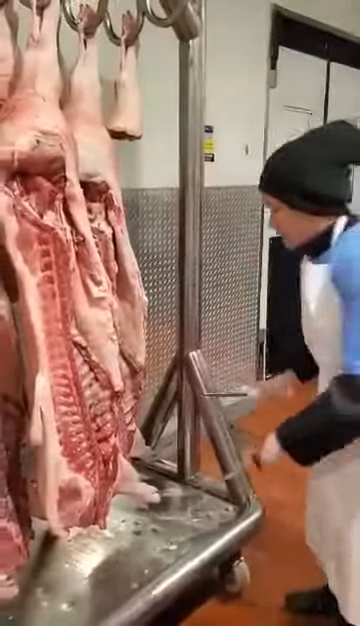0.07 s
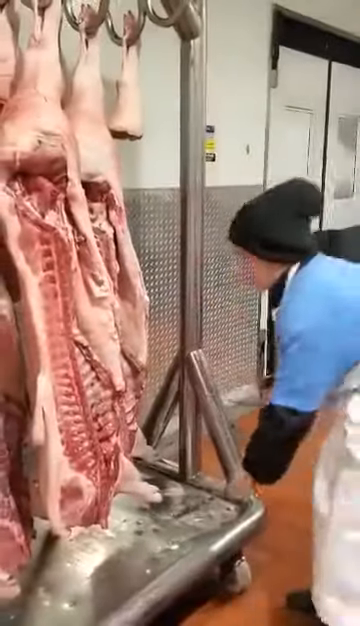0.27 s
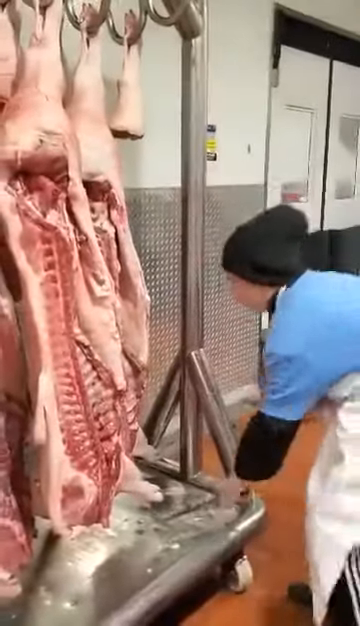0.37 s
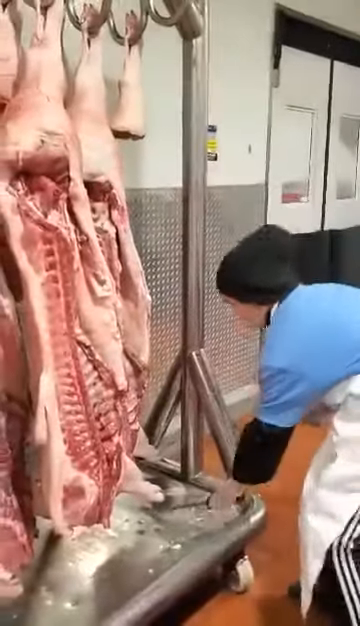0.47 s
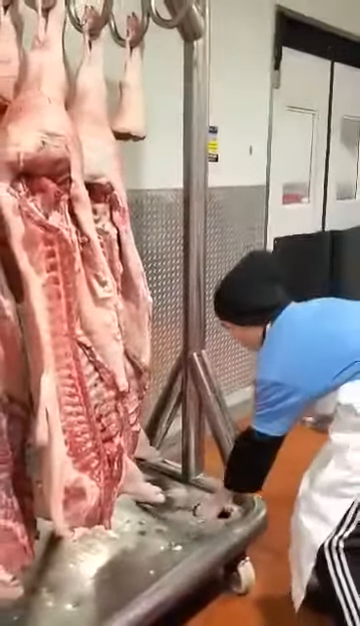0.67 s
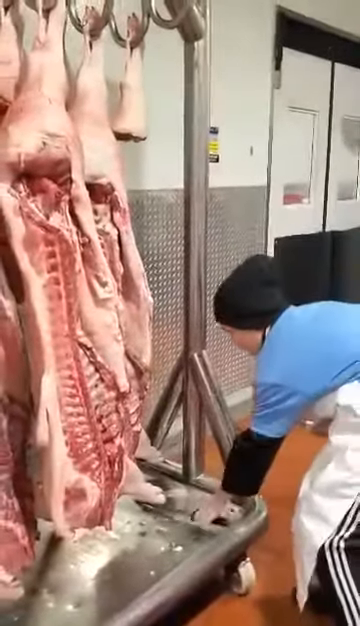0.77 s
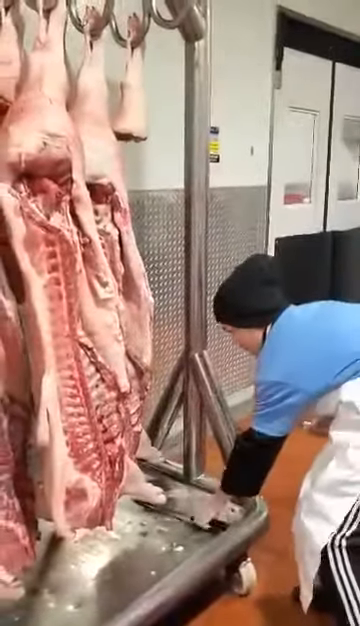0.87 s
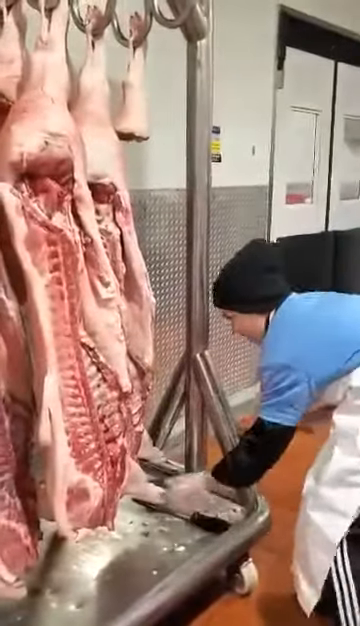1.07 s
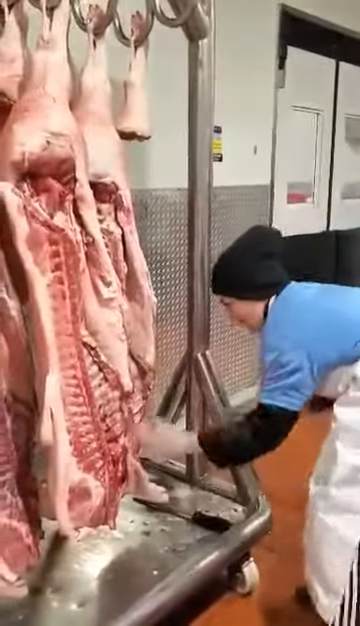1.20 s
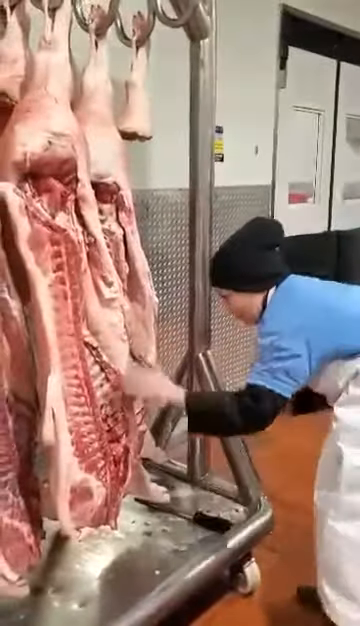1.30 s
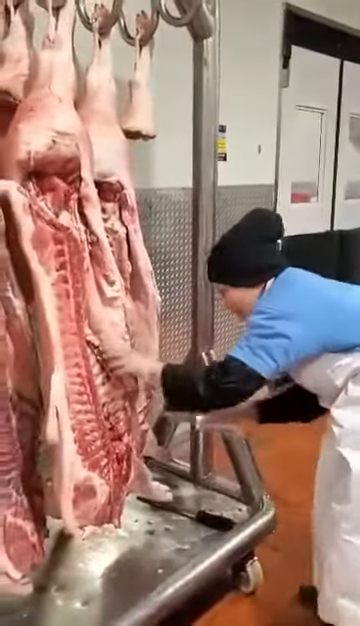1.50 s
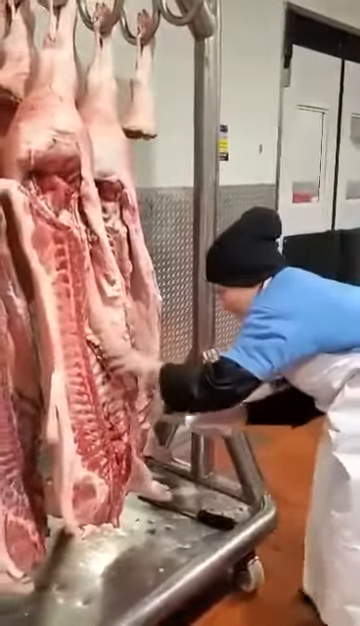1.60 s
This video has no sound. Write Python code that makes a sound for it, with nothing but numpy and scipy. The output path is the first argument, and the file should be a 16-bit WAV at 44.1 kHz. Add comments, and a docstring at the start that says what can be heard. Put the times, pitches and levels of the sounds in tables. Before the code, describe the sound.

A nearby knife clatters twice on a steel deck, first landing and sliding, then rattling to rest. The deck rings low and the hard room echoes, while cooling machinery hums and an apron rustles softly.

```python
"""A knife is put down on the steel deck of a meat rack in a hard-walled cutting room: it lands with a
bright clank, slides a little, then is let go and rattles flat. Each contact is a set of noise bursts
plus the blade's modes; the deck booms in its own low modes and the room answers. Cooling machinery hums,
an apron rustles, and the recorder's gain control ducks at the blows and recovers slowly."""
import sys
import numpy as np
from scipy import signal
from scipy.fft import rfft, irfft, next_fast_len
from scipy.io import wavfile
from scipy.ndimage import uniform_filter1d, map_coordinates

SR = 44100
rng = np.random.default_rng(int(sys.argv[2]) if len(sys.argv) > 2 else 0)


def to_wav(sig):
    """Store sig (one row per channel, or 1-D mono) as 16-bit WAV at the path in sys.argv[1].

    Samples outside -1..1 are clipped; the rate is SR.
    """
    pcm = np.clip(np.atleast_2d(sig), -1, 1) * 32767
    pcm = np.round(pcm).astype(np.int16)
    wavfile.write(sys.argv[1], SR, pcm.T)  # frames by channels


N = 72765
TIME_S = np.arange(N) / SR


def amp(db):
    """Decibels to gain."""
    return 10 ** (np.asarray(db) / 20)


def unit_rms(x):
    """Scale to rms 1."""
    return x / np.sqrt(np.mean(x ** 2) + 1e-20)


def at_hz(points, hz):
    """Interpolate (frequency [Hz], value) points on a log axis."""
    knots_hz, values = np.transpose(points)
    return np.interp(np.log(hz + 1), np.log(knots_hz + 1), values)


def filtered(x, response):
    """Apply a gain given as a function of Hz."""
    size = next_fast_len(N + 8192)
    return irfft(rfft(x, size) * response(np.fft.rfftfreq(size, 1 / SR)), size)[..., :N]


def wobble(position):
    """Smooth random curve, one knot per whole number."""
    return map_coordinates(rng.standard_normal(int(position.max()) + 4), [position])


def add(out, start_s, sound):
    """Mix a sound in from start_s."""
    start = round(start_s * SR)
    out[:, start:] += sound[:, :N - start]


# Stereo likeness (frequency [Hz], left-right correlation [-1..1])
CORRELATION = [(60, 1), (180, 0.95), (520, 0.39), (1200, -0.029), (4500, 0.018), (13000, -0.045)]
def spread_rad(hz):
    """Mid/side angle: near mono in the bass, wide above."""
    return np.arccos(np.clip(at_hz(CORRELATION, hz), -1, 1)) / 2


def noise(spectrum):
    """Coloured stereo noise, rms 1."""
    def mid_side_gain(hz):
        angle = spread_rad(hz)
        return amp(at_hz(spectrum, hz)) * [np.cos(angle), np.sin(angle)]
    mid, side = filtered(rng.standard_normal((2, N)), mid_side_gain)
    return unit_rms(np.array([mid + side, mid - side]))


def mode(hz, t60_s, waver_hz):
    """Damped stereo partial, slightly unsteady in pitch."""
    offset_rad = spread_rad(hz) * np.array([[1], [-1]]) * rng.choice([-1, 1])
    detune_hz = waver_hz * np.interp(TIME_S, np.arange(256) / 100, rng.standard_normal(256))
    cycles = hz * TIME_S + np.cumsum(detune_hz) / SR + rng.random()
    return np.sin(2 * np.pi * cycles + offset_rad) * amp(-60 * TIME_S / t60_s)


def steel(x, ripple_db=4.3, spacing_hz=55, full_depth_hz=2500, peak_db=2, width_hz=50):
    """Colour x with sheet steel's clustered resonances and the blade's peaks."""
    def response(hz):
        depth_db = ripple_db * np.clip(hz / full_depth_hz, 0, 1)
        ripple = amp(depth_db * np.clip(wobble(hz / spacing_hz), -2, 1))
        peaks = sum(amp(peak_db + db) / (1 + (2 * (hz - centre_hz) / width_hz) ** 2)
                    for centre_hz, db in BLADE_MODES)
        return ripple * (1 + peaks)
    return filtered(x, response)


# Room decay (frequency [Hz], t60 [s])
ROOM_DECAY = [(100, 0.85), (250, 1.49), (800, 0.75), (2500, 0.73), (5000, 0.7), (12000, 0.39)]
def strikes(times_s, levels_db, spectrum, t60_s, wet_db):
    """Bursts of dense resonance: a crack, a short ring and a room tail that darkens as it dies."""
    crack_db, crack_t60_s, room_build_s = -37, 0.0036, 0.042
    direct, diffuse = unit_rms(steel(np.array([noise(spectrum), noise(spectrum)])))
    envelope = amp(-60 * TIME_S / t60_s) + amp(crack_db - 60 * TIME_S / crack_t60_s)
    hz, frame_s, frames = signal.stft(diffuse, SR, nperseg=512)
    room_fade = amp(-60 * frame_s / at_hz(ROOM_DECAY, hz)[:, None])
    room_build = 1 - np.exp(-TIME_S / room_build_s)
    out = np.zeros((2, N))
    for start_s, db in zip(times_s, levels_db):
        shifted = np.roll(frames, 2 * rng.integers(frames.shape[2] // 2), axis=2)  # new noise per strike
        tail = signal.istft(shifted * room_fade, SR)[1][:, :N]
        burst = np.roll(direct, rng.integers(N), axis=1) * envelope
        add(out, start_s, amp(db) * (burst + amp(wet_db) * tail * room_build))
    return out


# Fan rush (frequency [Hz], density [dB])
FAN_SPECTRUM = [(15, -33), (27, -0.5), (39, -6), (58, 5), (80, -6), (100, -5), (260, -8), (480, -16),
                (3000, -32.5), (7500, -45), (13000, -45.5)]
# Hum lines (frequency [Hz], level [dB])
HUM_LINES = [(57, -48), (79, -34), (116, -38.5), (166, -36.5)]
def machinery(rush_db=-33):
    """Cooling fans: a low rush with a few hum lines."""
    rush = amp(rush_db) * noise(FAN_SPECTRUM)
    hum = sum(amp(db) * mode(hz, t60_s=np.inf, waver_hz=2.8) for hz, db in HUM_LINES)
    return rush + hum


# Rustle envelope (time [s], level [dB])
RUSTLE_ENVELOPE = [(0, -48.5), (.15, -43), (.32, -42.5), (.42, -51), (1.2, -42.5), (1.65, -56)]
# Cloth noise (frequency [Hz], density [dB])
CLOTH_SPECTRUM = [(300, 6), (1200, 2.5), (3500, -1.5), (7500, -12), (9500, -7.5), (13000, -10.5)]
def apron(crinkle_db=1.5, crinkles_per_s=25):
    """The apron rustles as its wearer bends down."""
    level_db = np.interp(TIME_S, *np.transpose(RUSTLE_ENVELOPE))
    return amp(level_db + crinkle_db * wobble(TIME_S * crinkles_per_s)) * noise(CLOTH_SPECTRUM)


# Handling ticks (time [s], level [dB])
TICK_HITS = [(.138, -40.5), (0.154, -38), (1.441, -42)]
# Tick colour (frequency [Hz], density [dB])
TICK_SPECTRUM = [(1000, 7), (6500, 1), (8000, -9), (13000, -3)]
def ticks():
    """Light ticks of handling."""
    return strikes(*np.transpose(TICK_HITS), TICK_SPECTRUM, t60_s=0.12, wet_db=-8.5)


# Scrape envelope (time [s], level [dB])
SCRAPE_ENVELOPE = [(.55, -51), (.58, -33), (.77, -27.5), (.86, -45.5), (.915, -33), (.95, -30), (1.03, -27),
                   (1.14, -72)]
# Scrape colour (frequency [Hz], density [dB])
SCRAPE_SPECTRUM = [(400, -8), (3200, 6), (4500, 1.5), (8000, -7), (9200, -6), (13000, -10)]
def slide(rough_db=5, slips_per_s=200):
    """The blade scrapes grittily over the deck after landing, and again as it settles flat."""
    level_db = np.interp(TIME_S, *np.transpose(SCRAPE_ENVELOPE), left=-np.inf, right=-np.inf)
    grit = amp(rough_db * np.tanh(wobble(TIME_S * slips_per_s)))
    return amp(level_db) * unit_rms(grit * steel(noise(SCRAPE_SPECTRUM)))


# Blows that ring the whole deck (time [s], level [dB], place [0 rim, 1 further in])
DECK_BLOWS = [(.434, -5.5, 0.17), (.843, -11, 0.94)]
# Deck modes (frequency [Hz], t60 [s], struck at rim [dB], struck further in [dB])
DECK_MODES = [(129.5, 3.25, -10, -2.5), (154.5, 1.08, 6.5, -8.5), (192, 1.362, -5, 2),
              (213.1, 1.78, 0.5, -8), (268.3, 1.58, -8.5, 3.5), (341.5, 1.18, -10.5, 2),
              (368, 0.96, -34.5, -0.5), (423.2, 0.84, -8.5, -10), (612, 1.32, -13, -12.5),
              (665.8, 1.6, -10.5, -22.5), (746, 1.14, -22, -5.5), (804, 0.54, -6, 4),
              (1099, 1.27, -8.5, -16.5), (1167, 0.77, -30, -2.5), (1240, 1.23, -12, -13.5)]
def deck(attack_s=0.018, waver_share=0.01455):
    """The sheet-steel deck booms; the place of the blow decides which modes speak."""
    out = np.zeros((2, N))
    attack = 1 - np.exp(-TIME_S / attack_s)
    for start_s, db, place in DECK_BLOWS:
        ring = sum(amp(rim_db + place * (inner_db - rim_db)) * mode(hz, t60_s, waver_share * hz)
                   for hz, t60_s, rim_db, inner_db in DECK_MODES)
        add(out, start_s, amp(db) * ring * attack)
    return out


# Blade modes (frequency [Hz], relative level [dB])
BLADE_MODES = [(2635, -9), (3100, -6.5), (3252, -9), (3490, -10), (4415, -6), (4690, -10.5), (9658, -4.5),
               (11450, -16), (12700, -5)]
def blade(lowest_t60_s=0.45, damping_power=0.8, scatter_db=1.8):
    """One ring of the blade, its modes mixed at random; high modes die first."""
    lowest_hz = BLADE_MODES[0][0]
    ring = np.zeros((2, N))
    for hz, db in BLADE_MODES:
        t60_s = lowest_t60_s * (lowest_hz / hz) ** damping_power
        ring += amp(db + rng.normal(0, scatter_db)) * mode(hz, t60_s, waver_hz=16)
    return ring


# Knife-deck contacts (time [s], clatter [dB], thud [dB], blade [dB])
KNIFE_CONTACTS = [(.432, -18.5, -17.5, -23), (0.4378, -16, -8.5, -13), (0.4438, -6.5, -18.5, -12),
                  (0.457, -15.5, -14, -15.5), (.492, -13.5, -15.5, -24.5), (.536, -29, -16.5, -26),
                  (.574, -12.5, -12, -21), (.624, -25.5, -19.5, -23), (0.8426, -36, -17.5, -21),
                  (.866, -16, -25, -26.5), (.881, -13.5, -13, -16.5), (0.9041, -10.5, -22.5, -17.5),
                  (.919, -16.5, -24.5, -18), (.968, -22.5, -22.5, -31.5), (1.066, -31.5, -15.5, -57)]
# Dull handle knocks (time [s], level [dB])
HANDLE_KNOCKS = [(.844, -8.5), (.878, -18)]
# Dense resonances of deck, handle and blade edge (frequency [Hz], density [dB])
CLATTER_SPECTRUM = [(200, -9.5), (450, 0), (1150, 0), (1800, -0.5), (3200, -9.5), (3850, -13.5),
                    (4500, -20), (5500, -16), (7800, -20.5), (9200, -37), (13000, -22)]
THUD_SPECTRUM = [(40, -35), (90, -11.5), (125, -6.5), (200, -0.5), (300, -7.5), (450, -18.5), (900, -35.5),
                 (3000, -65)]
HANDLE_SPECTRUM = [(500, -20), (610, 4), (700, -3.5), (800, 4), (900, -8.5), (1200, -11.5), (4000, -31.5)]
EDGE_SPECTRUM = [(1000, 4.5), (3000, 2), (4500, 4), (5700, -16.5), (8100, -14), (8800, 8.5), (9700, -0.5),
                 (10500, 1), (11600, 8.5), (13000, 2.5)]
# Room tail gains (clatter [dB], thud [dB], handle [dB], edge [dB])
ROOM_SENDS_DB = [0, 4, -4, -1]
def knife(ring_db=-5):
    """Every contact rattles and thumps the deck and rings the blade; the handle knocks lower."""
    times_s, clatter_db, thud_db, blade_db = np.transpose(KNIFE_CONTACTS)
    clatter_wet_db, thud_wet_db, handle_wet_db, edge_wet_db = ROOM_SENDS_DB
    clatter = strikes(times_s, clatter_db, CLATTER_SPECTRUM, t60_s=0.16, wet_db=clatter_wet_db)
    thud = strikes(times_s, thud_db, THUD_SPECTRUM, t60_s=0.26, wet_db=thud_wet_db)
    handle = strikes(*np.transpose(HANDLE_KNOCKS), HANDLE_SPECTRUM, t60_s=0.36, wet_db=handle_wet_db)
    edge = strikes(times_s, blade_db, EDGE_SPECTRUM, t60_s=0.1, wet_db=edge_wet_db)
    out = clatter + thud + handle + edge
    for start_s, db in zip(times_s, blade_db):
        add(out, start_s, amp(db + ring_db) * blade())
    return out


# Stereo balance of knife and deck (frequency [Hz], left minus right [dB])
BALANCE = [(250, -.5), (600, 2.5), (1200, -4), (2500, 0.7), (5000, 3), (9000, -1), (12500, 1.5)]
def scene():
    """Knife and deck, panned by band, over handling sounds and machinery."""
    pan = lambda hz: amp(at_hz(BALANCE, hz) * np.array([[0.5], [-0.5]]))
    clank = filtered(knife() + deck() + slide(), pan)
    return clank + apron() + ticks() + machinery()


def record(dry, sense_s=0.012, threshold_db=-17.5, duck_share=0.62, top_hz=13080):
    """Gain control ducks by a share of the held overshoot and creeps back; then a steep low-pass."""
    power = uniform_filter1d(np.mean(dry ** 2, axis=0), int(sense_s * SR))
    level_db = 10 * np.log10(np.abs(power) + 1e-12)
    over_db = np.maximum(level_db - threshold_db, 0)
    release_db = 6.5 * TIME_S  # held overshoot falls 6.5 dB/s
    held_db = np.maximum.accumulate(over_db + release_db) - release_db
    ducked = dry * amp(-duck_share * held_db)
    return filtered(ducked, lambda hz: 1 / np.sqrt(1 + (hz / top_hz) ** 200))


dry = scene()
out = record(dry)
to_wav(out)
```